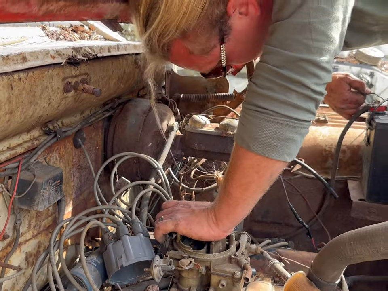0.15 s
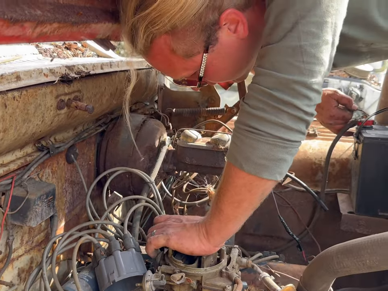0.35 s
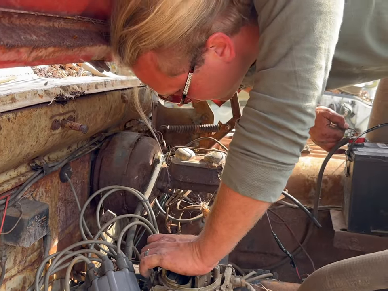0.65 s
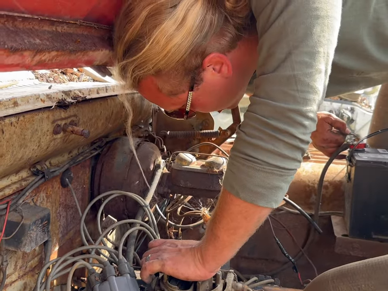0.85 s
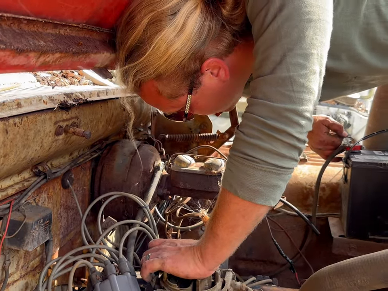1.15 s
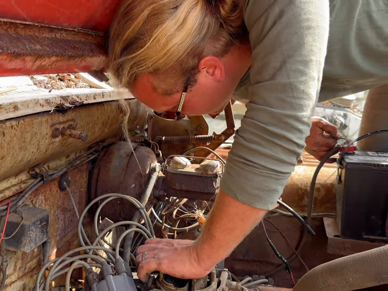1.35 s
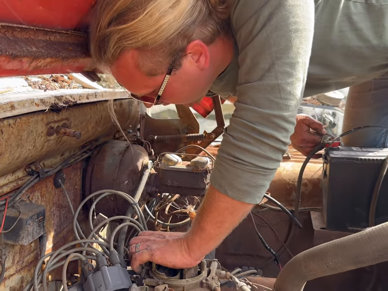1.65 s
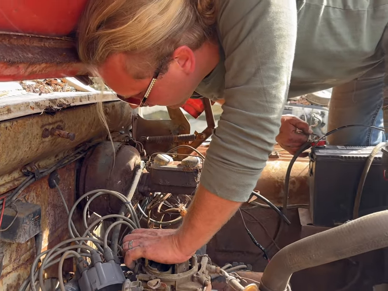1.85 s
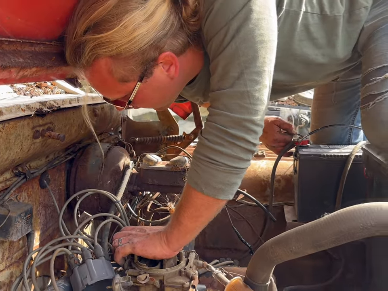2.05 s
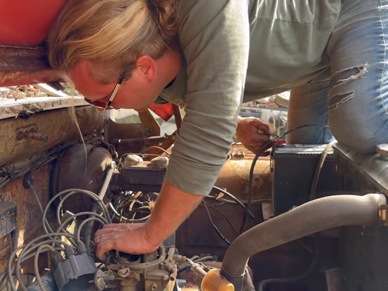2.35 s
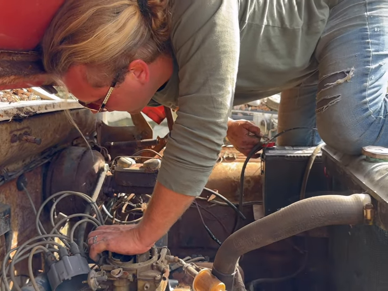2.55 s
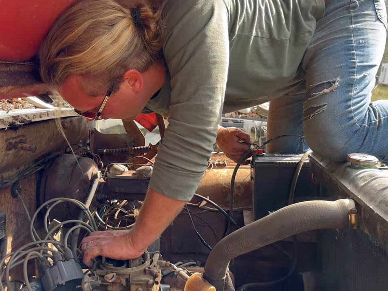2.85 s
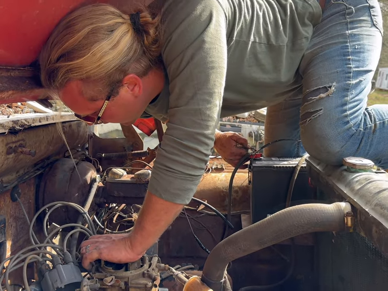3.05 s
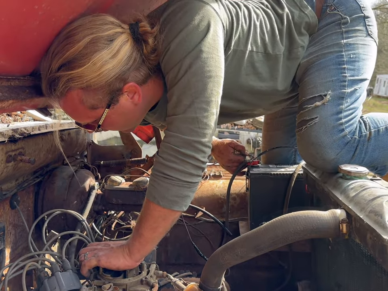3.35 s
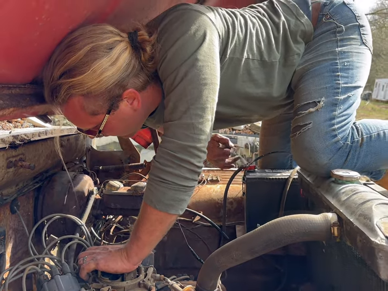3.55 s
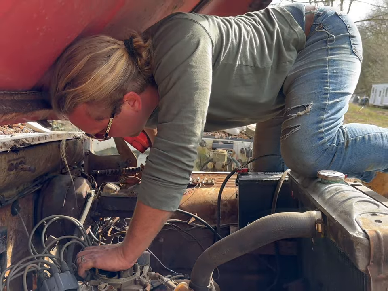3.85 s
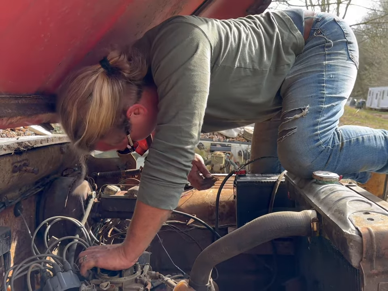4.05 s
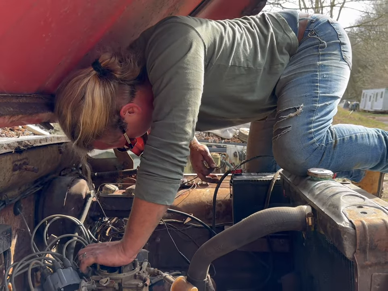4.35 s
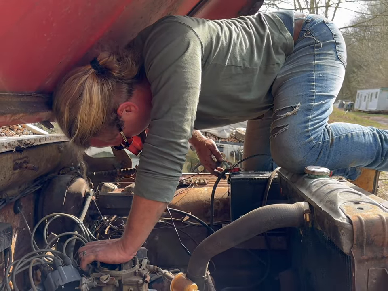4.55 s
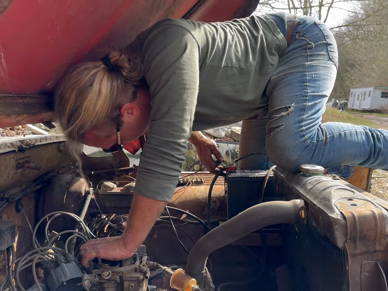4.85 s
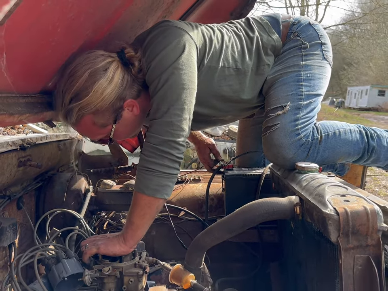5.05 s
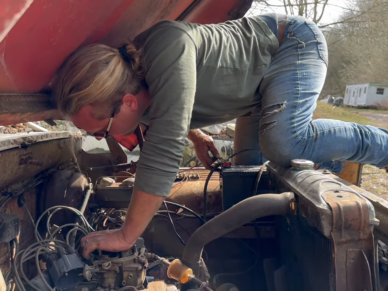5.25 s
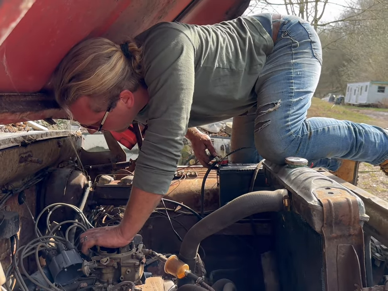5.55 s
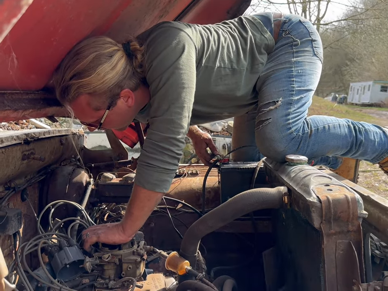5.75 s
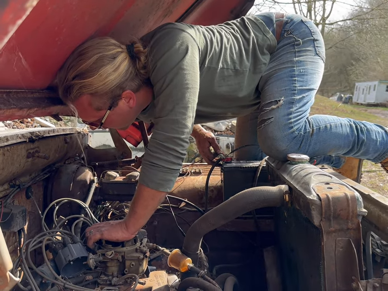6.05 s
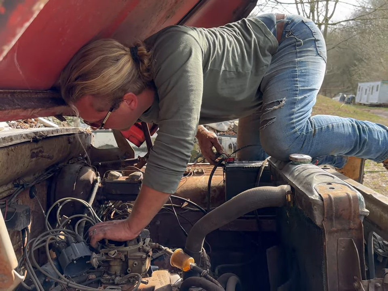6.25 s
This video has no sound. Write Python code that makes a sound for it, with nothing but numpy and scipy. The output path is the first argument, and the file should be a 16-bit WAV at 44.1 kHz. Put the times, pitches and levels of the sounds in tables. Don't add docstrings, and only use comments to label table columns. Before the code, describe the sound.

Under the raised hood of an old truck outdoors, low wind and a few dull body bumps precede a sharp clack. The starter slams in loudly, then grinds and whines in uneven pulses for nearly three seconds, with intake thumps and hissing leaks. It cuts off, rings and ticks down to near quiet, then a second, softer cranking begins and continues to the end. Close stereo microphone, slightly overloaded at the first engagement.

```python
import sys
import numpy as np
from scipy import signal
from scipy.fft import rfft, irfft, next_fast_len
from scipy.io import wavfile
from scipy.ndimage import uniform_filter1d, map_coordinates

SR = 44100
rng = np.random.default_rng(int(sys.argv[2]) if len(sys.argv) > 2 else 0)


def decibels_to_gain(level_db):
    exponent = np.asarray(level_db, float) / 20
    return 10 ** exponent


def transcribe(signal):
    frames = np.atleast_2d(signal).T
    limited = np.clip(frames, -1, 1)
    pcm = np.round(limited * 32767).astype(np.int16)
    wavfile.write(sys.argv[1], SR, pcm)


N = 282328

RELEASE_S = 3.385


def unit(x):
    return x / np.sqrt(np.mean(x ** 2) + 1e-20)


def along(points, hz):
    f, v = np.transpose(points)
    return np.interp(np.log(hz + 1), np.log(f + 1), v)


def curves(rows, silent=None):
    s, *cols = np.transpose(rows)
    return [np.interp(np.arange(N) / SR, s, c, silent, silent) for c in cols]


def wobble(rate_hz):
    knots = rng.standard_normal(int(N * 400 / SR) + 4)
    return map_coordinates(knots, [np.arange(N) * rate_hz / SR])


def decay(t, t60_s):
    return decibels_to_gain(-60 * t / t60_s)


def add_at(out, start_s, sound):
    out[round(start_s * SR):][:len(sound)] += sound


def filtered(x, response):
    m = next_fast_len(N + 8192)
    return irfft(rfft(x, m) * response(np.fft.rfftfreq(m, 1 / SR)), m)[..., :N]


def noise(spectrum):
    return unit(filtered(rng.standard_normal(N), lambda hz: decibels_to_gain(along(spectrum, hz))))


def patchy(x, patchy_db):
    z = signal.stft(x, nperseg=512)[2]
    field = uniform_filter1d(rng.standard_normal(z.shape), size=3, axis=0)
    field = uniform_filter1d(field, size=6, axis=1)
    return unit(signal.istft(z * decibels_to_gain(patchy_db * unit(field)), nperseg=512)[1][:N])


def swells(rows, order=2):
    t = np.arange(0, N + 16, 16) / SR
    total_db = sum(db * np.exp(-abs((t - s) / half_s) ** order) for s, db, half_s in rows)
    return np.interp(np.arange(N) / SR, t, total_db)


def resonance(f, centre_hz, width_hz):
    return 1j * f * width_hz / (centre_hz ** 2 - f ** 2 + 1j * f * width_hz)


def housing(f):
    # mode_hz, width_hz, level_db
    modes = [(595, 40, -1), (750, 35, -5), (880, 40, -7), (960, 40, 0), (1090, 40, 3), (1280, 45, 0),
             (1390, 50, -3), (1530, 25, 3), (1745, 25, -3), (1950, 40, -4), (2330, 40, -5), (2510, 35, 0),
             (2810, 50, -8), (3300, 60, -9)]
    return .3 + abs(sum(decibels_to_gain(db) * resonance(f, c, w) * (-1) ** k for k, (c, w, db) in enumerate(modes)))


def ringing(f):
    # mode_hz, width_hz, level_db
    sharp_modes = [(562.3, 5.4, 0.5), (860, 40, 6), (921, 3.5, -8), (1099.3, 15, -4.5), (1277, 8, -7),
                   (1436, 33, 2), (1640, 72, 8.5), (2260, 40, -1.5), (2480, 24, -5.5), (2740, 43, -5)]
    return housing(f) * (0.77 + sum(decibels_to_gain(db) * resonance(f, c, w) for c, w, db in sharp_modes))


def grind_load():
    # start_s, grind_db, leak_share_db
    bursts = [
        [(.7, -52, -8), (.72, -14.5, -12), (.735, -16, -18.5), (.78, -11, -18.5), (1.02, -16.5, -16),
         (1.4, -18, -14.5), (1.85, -21.5, -14), (2.4, -23, -15), (3.4, -24, -16.5)],
        [(3.4, -22.5, -22), (3.43, -32, -16), (3.506, -43.5, -23), (3.566, -50, -7.5), (3.75, -55, -19),
         (3.85, -54.5, -24), (4.014, -73, -14), (4.03, -87, -1), (4.15, -94, -4)],
        [(4.991, -41, -6), (4.999, -26.5, -14.5), (5.027, -27, -22.5), (5.111, -23, -20), (5.177, -27, -26.5),
         (5.21, -24.5, -22.5), (5.45, -26.5, -16.5), (6.41, -25, -18.5)],
    ]
    return np.max([curves(rows, silent=-140) for rows in bursts], axis=0)


def strokes():
    # start_s, crank_cycles, speed_share, effort_db, lean_db (per 100 Hz: whether high or low whine rings out)
    crank = [
        [(.712, .1, 0.74, -15.5, -3.5), (.79, .146, 0.85, -21, -2.5), (.918, .218, .845, -3.5, 2.5),
         (1.002, .26, .81, -11, 0), (1.07, .312, .86, -13.5, -2.5), (1.136, .382, 0.86, -12, -3),
         (1.32, .556, 1.034, -10, 2.5), (1.728, 1, 1.017, -18, 4), (2.2, 1.5, 1.02, -26, 4),
         (2.673, 2, 1.01, -28.5, 5), (3.04, 2.38, 1.0, -31, -1), (3.41, 2.77, 0.97, -27.5, 4)],
        [(5.0, -.24, 0.74, -37, 7), (5.1, -.12, 0.61, -42.5, 4), (5.22, 0, .79, -48.5, 1.5),
         (5.296, .057, .82, -29.5, -21), (5.355, .128, 0.79, -30.5, -10), (5.46, .218, 0.96, -29, -3.5),
         (5.55, .312, 0.97, -28, 0.5), (5.69, .445, 0.99, -25.5, 3.5), (5.92, .7, 0.98, -26, 4.5),
         (6.1, .895, 1.0, -26, 2.5), (6.195, 1, 0.99, -27, 4.5), (6.41, 1.225, 0.95, -26, -4.5)],
    ]
    # crank_cycles, whine_hz, whine_db (over effort), tooth_db (over grind)
    cycle = [(0, 1101, 3.5, -17), (.057, 1132, 1.5, -18), (.128, 1025, 0.5, -22), (.218, 1266, -1, -26),
             (.26, 1201, -2.5, -18.5), (.312, 1309, 4.5, -22.5), (0.38, 1128, 3.5, -15.5),
             (.445, 1267, 1, -24.5), (.505, 1161, -2.5, -15.5), (.556, 1220, -4, -21),
             (0.63, 1067, -0.5, -21.5), (.70, 1242, -4.5, -22.5), (.762, 1131, -0.5, -19),
             (.895, 1402, -2, -36.5)]
    lean_hz, tooth_slow_db = 1163, 32
    angle, speed, effort_db, lean_db = curves(crank[0] + crank[1])
    at, *cols = np.transpose(cycle + [(0.98, *cycle[0][1:])])
    place = np.interp(angle % 1, at, np.arange(len(at)))
    eased = np.floor(place) + (1 - np.cos(np.pi * (place % 1))) / 2
    hz, whine_db, tooth_db = [np.interp(eased, np.arange(len(at)), c) for c in cols]
    whine_db = effort_db + whine_db + lean_db * (hz - lean_hz) / 100
    tooth_db = grind_load()[0] + tooth_db - tooth_slow_db * abs(1 - speed)
    return speed * hz, whine_db, tooth_db


def whine():
    # centre_s, swell_db, half_length_s
    surges = [(0.858, 6, 0.0095), (0.933, 4.5, 0.011), (0.99, 4, .007), (1.138, 1, .008),
              (1.158, 4.5, .006), (1.362, 6, .007), (1.41, 5, 0.0089), (1.6, -4, .012), (1.635, 7, .01),
              (1.53, -5, .02), (1.345, -8.5, .006), (1.005, -6, .008), (2.47, -4.5, .03),
              (1.705, 7, 0.0091), (1.785, -8, 0.01), (2.02, -6, 0.0072), (2.053, -5.5, 0.006),
              (2.69, 8.5, .015), (3.35, 6, 0.019), (0.883, 9.5, 0.0056), (0.908, 5, 0.01),
              (0.97, 10, 0.017), (1.049, 6, 0.02), (1.103, 13, 0.011), (1.176, 4, 0.011), (1.256, 8, 0.022),
              (1.308, 9, 0.0098), (1.384, 10, 0.015), (1.467, 2, 0.024), (1.578, 6.5, 0.007),
              (1.659, 12, 0.01), (1.682, 9, 0.007), (1.734, 11, 0.0164), (1.761, 9, 0.0054),
              (1.805, 13, 0.0082), (1.914, 10, 0.0083), (1.942, 11, 0.015), (2.001, 11, 0.008),
              (2.04, 8.5, 0.01), (2.067, 13.5, 0.013), (2.142, 9, 0.028), (2.212, 14, 0.014),
              (2.297, 5.5, 0.015), (2.397, 12.5, 0.015), (2.5, 4, 0.0046), (2.576, 14.5, 0.015),
              (2.617, 16, 0.0058), (2.66, 11.5, 0.021), (2.763, 9.5, 0.007), (2.814, 4, 0.0048),
              (2.879, 13.5, 0.017), (2.972, 9.5, 0.016), (3.039, 12.5, 0.015), (3.101, 14, 0.013),
              (3.129, -6, 0.006), (3.167, 16, 0.011), (3.252, 15.5, 0.0082), (3.269, 17, 0.0047),
              (3.299, 8, 0.015), (3.38, 10, 0.0062)]
    # centre_s, swell_db, half_length_s
    late_surges = [(5.258, 17, 0.013), (5.282, 9, 0.0073), (5.298, 8.5, 0.0039), (5.313, 7.5, 0.023),
                   (5.363, 4, 0.006), (5.384, 7, 0.0089), (5.436, 7.5, 0.0068), (5.547, 7, 0.0084),
                   (5.576, 9, 0.0049), (5.628, 8.5, 0.019), (5.689, 5.5, 0.017), (5.839, 12, 0.025),
                   (5.89, 7.5, 0.035), (5.973, 8, 0.008), (6.131, 8.5, 0.009), (6.196, 15.5, 0.0084),
                   (6.234, 15, 0.0055), (6.301, 15, 0.011), (6.322, 18, 0.0047), (6.336, 12.5, 0.0047),
                   (6.361, 6, 0.005), (5.271, -10, .004), (5.236, 11, 0.0055), (5.597, -5, .008),
                   (5.655, -7, .012), (6.05, -5, .015), (6.175, 4, .008), (6.215, -18, 0.012),
                   (6.265, -11, 0.011), (6.285, 11.5, 0.0065), (6.1, 4.5, .02)]
    # start_s, octave_db, stack_db (gear mesh over its load)
    overtones = [(.7, -22.5, 4), (.78, -13, -0.5), (.87, -15.5, 2), (.93, -19, 0.5), (1.0, -22, -1),
                 (1.07, -20.5, 1.5), (1.16, -20, 7), (1.22, -28, 2.5), (1.5, -28, 1.5), (1.62, -28, 10.5),
                 (1.75, -35, 2.5), (2.3, -31, 3), (2.72, -27.5, 1.5), (3.4, -28.5, 3), (5.0, -39, 1),
                 (5.3, -24.5, 3.5), (5.39, -30, 1.5), (5.45, -26.5, 1.5), (5.55, -26, 2.5),
                 (5.98, -29, 1.5), (6.06, -27, 6.5), (6.11, -23.5, 3.5), (6.2, -34.5, 1.5),
                 (6.33, -32.5, 1.5), (6.41, -25.5, -1)]
    # freq_hz, level_db
    end_cap = [(1400, -6), (1900, -1), (2150, -3), (2330, 0), (2420, -3), (2500, 1), (2650, -3), (2800, -1),
               (3200, -10)]
    mesh_multiples = [2, 2.5, 3, 3.5, 4.5, 5, 5.5, 6, 6.5, 7, 9, 10, 12]
    mesh_levels = [-0.5, -6.5, 4, -10.5, -3.5, 9, 3, 6.5, 1, 3, 3.5, 5, 5]

    hz, whine_db, tooth_db = strokes()
    t = np.arange(N) / SR
    running = uniform_filter1d(1. * ((t > .715) & (t < 4) | (t > 5)), 400)
    running = running * decibels_to_gain(-697 * np.clip(t - RELEASE_S, 0, None) * (t < 4.5))
    turns = np.cumsum(hz * (1 + 0.00833 * wobble(60))) / SR

    throb = decibels_to_gain(2.5 * np.sin(2 * np.pi * turns / 23 + 1.2 * wobble(8)) + wobble(35))
    throb = throb * decibels_to_gain(0.86 * swells(list(surges) + list(late_surges), order=3))
    bars = decibels_to_gain(0.71 * whine_db - 11.0) * throb * np.sin(2 * np.pi * turns)
    teeth = decibels_to_gain(tooth_db + 3.0 + 4.0 * wobble(25)) * np.sin(np.pi * turns / 2)

    mesh = np.zeros(N)
    for k, db in zip(mesh_multiples, mesh_levels):
        flutter = decibels_to_gain(db) * (1 + .55 * wobble(60))
        mesh += flutter * np.sin(k * np.pi * turns / 2 + .55 * wobble(40))
    octave_db, stack_db = curves(overtones)
    load_db = uniform_filter1d(whine_db, 12000)
    mesh *= decibels_to_gain(0.55 * load_db - 30.5 + stack_db)

    runout = 1 + .5 * np.sin(2 * np.pi * turns / 11.5 + 2 * wobble(10))
    octave = decibels_to_gain(octave_db + 2 * wobble(25)) * (runout + .3 * wobble(90))
    octave = octave * np.sin(4 * np.pi * turns + .7 * wobble(60))
    octave = filtered(octave, lambda f: housing(f) * decibels_to_gain(along(end_cap, f)))
    return running * (filtered(bars + mesh, ringing) + teeth + octave), turns


def grind(turns):
    # freq_hz, density_db
    metal_spectrum = [(71, -45), (120, -10), (223, -13.5), (298, -4.5), (392, -23), (849, -2.5),
                      (1220, -4.5), (1950, 0.5), (2380, -3), (4500, -14), (5850, -42.5), (9900, -120)]
    # freq_hz, density_db
    leak_spectrum = [(2060, -16.5), (3500, -4), (4190, -10), (5380, -1), (6740, -9), (7080, -9),
                     (8640, -11), (9930, -15.5), (10300, -9.5), (13400, -40), (22000, -120)]
    # freq_hz, density_db
    jet_spectrum = [(11500, -29.5), (12300, 0.5), (14000, -5), (15700, -0.5), (16500, -58)]
    # centre_s, swell_db, half_length_s
    puffs = [(.714, 2.5, 0.008), (1.1, 2.5, 0.02), (1.29, 1, 0.017), (1.575, 5, 0.074), (2.53, 6, 0.057),
             (3.5, 19.5, 0.053), (3.84, 8, 0.01), (5.0, 0, 0.012), (5.188, 11.5, 0.0061),
             (6.055, 5.5, 0.08)]
    grind_db, share_db = grind_load()
    puff_db = swells(puffs)
    leak_db = grind_db + share_db + puff_db
    jet_db = grind_db + share_db - 12.5 + 1.8 * puff_db
    gate = 1 + 0.56 * np.sin(np.pi * turns / 2)
    lumps = decibels_to_gain(1.2 * wobble(40) + 1.2 * wobble(150))
    grain = decibels_to_gain(0.46 * wobble(25) + 0.39 * wobble(300))

    def metal():
        struck = filtered(gate * noise(metal_spectrum), housing)
        return decibels_to_gain(grind_db - 5.0) * lumps * patchy(struck, patchy_db=3.5)

    def air():
        hiss = decibels_to_gain(leak_db + 3.0) * patchy(noise(leak_spectrum), patchy_db=2.5)
        return grain * (hiss + decibels_to_gain(jet_db) * noise(jet_spectrum))

    return metal() + air(), metal() + air()


def gulps():
    # start_s, peak_db
    shuts = [(0.748, -33.5), (0.858, -32), (1.119, -37), (1.247, -34), (1.487, -37), (1.599, -48.5),
             (1.857, -34.5), (2.066, -51.5), (2.186, -39.5), (2.429, -40), (2.804, -39), (3.136, -42.5),
             (3.38, -44.5), (5.016, -47.5), (5.189, -45.5), (5.4, -47.5), (5.715, -48), (5.961, -43.5),
             (6.335, -42.5)]
    out, t = np.zeros(N + SR), np.arange(SR // 4) / SR
    cycles = np.cumsum(140 + 420 * t) / SR
    thump = np.sin(2 * np.pi * cycles) * (decay(t, 0.1) + decay(t, 0.67) * (t < .13))
    push = .5 * np.sin(2 * np.pi * 55 * t) * decay(t, 0.51)
    onset = 1 - np.exp(-t / 0.0019)
    for s, db in shuts:
        add_at(out, s, decibels_to_gain(db + 2.5) * (thump + push) * onset)
    return out[:N]


def ticks():
    # start_s, peak_db, ring_hz, body_db
    contacts = [(0.6922, -33, 5900, 7), (0.7134, -9, 5060, 10.5), (0.7167, -21, 4700, -3),
                (3.5813, -62, 5510, -15), (3.633, -55.5, 6610, 26.5), (3.6634, -41, 3160, 2),
                (3.688, -58, 5000, 0), (3.745, -62, 4990, -1), (3.787, -60, 6000, -2.5),
                (3.897, -57.5, 6000, 0), (3.7257, -50, 4850, 18.5), (3.807, -62, 3830, -9),
                (3.8255, -54.5, 6100, 20), (3.837, -45, 6500, -28), (3.8733, -45, 3320, -9),
                (4.0014, -60, 5710, 3), (4.3964, -58, 3190, 8), (4.5311, -60, 6060, -6.5),
                (4.5746, -61.5, 4490, 0.5), (4.7102, -59, 5860, -3), (4.9477, -49, 5600, 0),
                (4.9957, -29, 4796, -22), (4.998, -22.5, 4100, 10), (5.0614, -43, 3230, 7),
                (5.0898, -41, 3230, 4), (5.1847, -21, 4450, 7.5), (5.225, -44, 3412, -2)]
    out, t = np.zeros(N + SR), np.arange(SR // 10) / SR
    for s, db, hz, body_db in contacts:
        hard = db > -45
        fall = decay(t, 0.019 + 0.028 * hard) + (.04 + .09 * hard) * decay(t, 0.077)
        crack = rng.standard_normal(len(t)) * fall
        part = signal.lfilter(*signal.iirpeak(hz, 2.5, SR), crack)
        snap = .15 * crack * (db > -25) * decay(t, .02)
        knock = signal.lfilter(*signal.iirpeak(1500, .8, SR), rng.standard_normal(len(t)))
        knock = decibels_to_gain(body_db - 7) * decay(t, 0.034) * knock
        add_at(out, s, decibels_to_gain(db + 3) * (part + snap + knock))
    return out[:N]


def slams():
    # start_s, peak_db, ring_hz
    blows = [(0.745, -35, 960), (0.767, -7, 958), (0.789, -1, 916), (0.81, -4.5, 977), (0.83, -2.5, 950),
             (5.038, -20.5, 863), (5.068, -21, 1098), (5.09, -14, 932), (5.109, -10.5, 974),
             (5.184, -26.5, 1106), (5.056, -25.5, 1096), (5.079, -21, 1086), (5.132, -20.5, 1020),
             (5.155, -26, 1270)]
    out, t = np.zeros(N + SR), np.arange(SR // 10) / SR
    swell = (1 - np.exp(-t / .004)) * decay(t, .04)
    for s, db, hz in blows:
        ring = np.sin(2 * np.pi * hz * t) + .2 * np.sin(4 * np.pi * hz * t)
        add_at(out, s, decibels_to_gain(db + 5.5) * swell * ring)
    return out[:N]


def after_ring():
    # mode_hz, level_db, t60_s
    modes = [(1120, -50, 0.44), (1720, -52, 0.8), (2040, -54, 1), (2510, -57, 0.69)]
    t = np.clip(np.arange(N) / SR - RELEASE_S, 0, None)
    out = np.zeros(N)
    for hz, db, t60_s in modes:
        level = decibels_to_gain(db + 3 * wobble(27)) * decay(t, t60_s)
        out += level * np.sin(2 * np.pi * hz * t + .5 * wobble(36))
    return out * (t > 0)


def coast():
    # start_s, pitch_hz, level_db
    run_down = [(3.5, 100, -76), (3.58, 103, -60), (3.76, 99, -62), (3.82, 81.8, -59.5), (4.1, 78.45, -71),
                (4.22, 80.4, -73), (4.32, 95.4, -85.5)]
    hz, db = curves(run_down)
    return decibels_to_gain(db + wobble(20)) * (db > -79) * np.sin(2 * np.pi * np.cumsum(hz) / SR)


def hood(x):
    t = np.arange(SR // 8) / SR
    tail = rng.standard_normal(len(t)) * decay(t, .06)
    return signal.fftconvolve(x, tail / np.linalg.norm(tail))[:N]


def ports(direct, other):
    # freq_hz, left_lead_rad
    lead = [(0, 0), (150, .5), (430, .7), (950, 1.0), (1120, .8), (1290, -1.7), (1640, -3.4), (1980, -4.1),
            (2500, -8), (3350, -8.5), (4300, -11.5), (6370, -18), (7400, -22), (7900, -25.1), (8500, -25.5),
            (10000, -27), (12900, -30), (13700, -31.42)]
    # freq_hz, likeness (0 to 1)
    alike = [(60, .5), (200, .75), (600, .72), (1300, .65), (3000, .4), (7000, .5), (12500, .75),
             (13600, .99)]
    # freq_hz, left_minus_right_db
    nearer = [(60, 0.5), (180, -1), (550, 2), (1650, 3.5), (4970, 7), (15000, -1)]
    sign = np.array([[1], [-1]])

    def turn(hz):
        return np.arccos(np.clip(along(alike, hz), 0, 1)) / 2

    def place(hz):
        return decibels_to_gain(sign * along(nearer, hz) / 2) * np.exp(.5j * sign * along(lead, hz))

    shared = filtered(direct, lambda hz: np.cos(turn(hz)) * place(hz))
    return shared + filtered(other, lambda hz: sign * np.sin(turn(hz)) * place(hz))


def bumps():
    # start_s, peak_db, pitch_hz
    knocks = [(0.023, -37.5, 122), (0.262, -45, 113), (0.38, -40, 112), (3.579, -44, 110), (3.69, -45, 220),
              (3.84, -50, 317), (3.96, -54.5, 322), (4.332, -56, 188), (4.406, -53, 138),
              (4.548, -52.5, 251), (4.575, -56, 150), (4.405, -63.5, 690), (4.553, -66.5, 600)]
    out, t = np.zeros(N + SR), np.arange(SR // 5) / SR
    shape = decay(t, 0.14) * (1 - np.exp(-t / 0.0015))
    for s, db, hz in knocks:
        add_at(out, s, decibels_to_gain(db - 4.5) * shape * np.sin(2 * np.pi * hz * t))
    return out[:N]


def near_air():
    # start_s, level_db
    rumble = [(0, -50), (.07, -49.5), (.25, -60.5), (.53, -50.5), (.68, -53), (.73, -42.5), (1.5, -44),
              (1.65, -46), (2.35, -61), (3.4, -61), (3.47, -69), (3.58, -54), (3.66, -75), (4.22, -69),
              (4.9, -78.5), (5.06, -57), (5.6, -59.5), (6.41, -71)]
    # freq_hz, density_db
    wind_spectrum = [(15, -50), (36, -25.5), (54, -1.5), (97, 0), (177, -24), (250, -25.5), (320, -50),
                     (550, -120)]
    # start_s, level_db
    rustle = [(.06, -100), (.12, -84), (.28, -69), (.38, -77), (.44, -100)]
    # start_s, level_db
    passing = [(4.3, -100), (4.5, -75), (4.75, -67), (5.0, -65), (5.1, -100)]
    # freq_hz, density_db
    tyre_spectrum = [(900, -36.5), (1400, -10), (1900, -7), (2400, -14), (3200, -23), (5000, -21),
                     (5700, -12), (6400, -32.5)]
    leaf_spectrum = [(3300, -36.0), (4100, -4.5), (4800, -10.5), (5800, -18), (7000, -41.5)]
    wind_db = curves(rumble)[0]
    leaves = decibels_to_gain(curves(rustle, silent=-140)[0] + 4 * wobble(30))
    road = decibels_to_gain(curves(passing, silent=-140)[0])

    def one_port():
        gust = decibels_to_gain(wind_db + 3.2 * wobble(16)) * noise(wind_spectrum)
        leaf = leaves * patchy(noise(leaf_spectrum), patchy_db=-1.0)
        return gust + leaf + road * patchy(noise(tyre_spectrum), patchy_db=2.0)

    return np.array([one_port(), one_port()]) * decibels_to_gain([[1.2], [-1.2]])


def yard():
    # start_s, level_db
    rests = [
        [(0.0, -75.5), (0.294, -74), (0.636, -69.5), (0.7, -75)],
        [(3.4, -38), (3.444, -54), (3.58, -60.5), (3.888, -66.5), (4.01, -72), (4.13, -77), (4.288, -76.5),
         (4.494, -72.5), (4.698, -79), (4.98, -78)],
    ]
    # freq_hz, density_db
    far_spectrum = [(88, -38.5), (150, -13), (313, -15.5), (398, -24.5), (441, -19), (1130, -24),
                    (1320, -20.5), (2330, -27), (3000, -31), (9000, -43), (11700, -74), (19800, -120)]
    far_db = np.maximum(*[curves(rows, silent=-140)[0] for rows in rests])
    far_db = np.maximum(far_db, -84)

    def far():
        return decibels_to_gain(far_db + 3.5 + 1.5 * wobble(26)) * patchy(noise(far_spectrum), patchy_db=3.5)

    return ports(far(), far())


def scene():
    tones, turns = whine()
    near, scattered = grind(turns)
    hits = gulps() + ticks() + slams() + after_ring()
    shimmer = 0.94 * tones * wobble(19)
    engine = ports(near + tones + hits, scattered + shimmer + hood(hits))
    return engine + coast() + bumps() + near_air() + yard()


def band_limit(x):
    return signal.sosfilt(signal.butter(12, 16970, fs=SR, output="sos"), x)


def record(dry):
    kept = [(10200, 0), (10700, -40), (11600, -40), (12500, 0), (15650, 0), (15800, -120)]  # Hz, dB
    rounded = dry / (1 + abs(dry / 1.1) ** 4) ** .25
    mix = filtered(rounded, lambda hz: decibels_to_gain(along(kept, hz)))
    return band_limit(mix)


dry = scene()
out = record(dry)
transcribe(out)
```